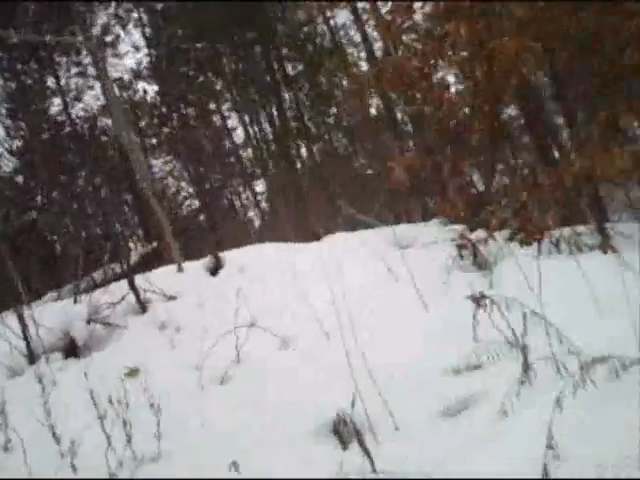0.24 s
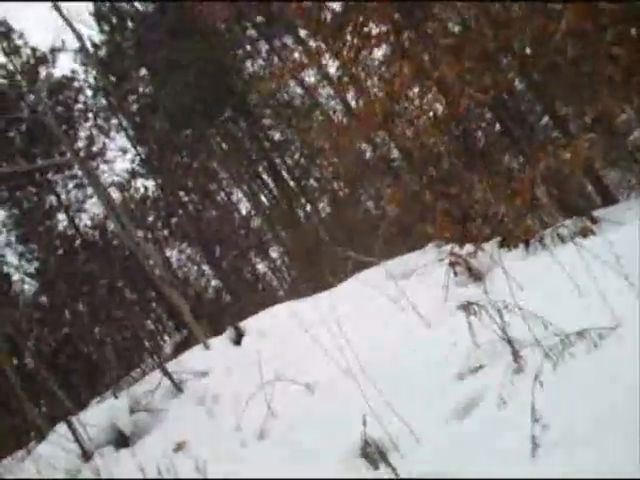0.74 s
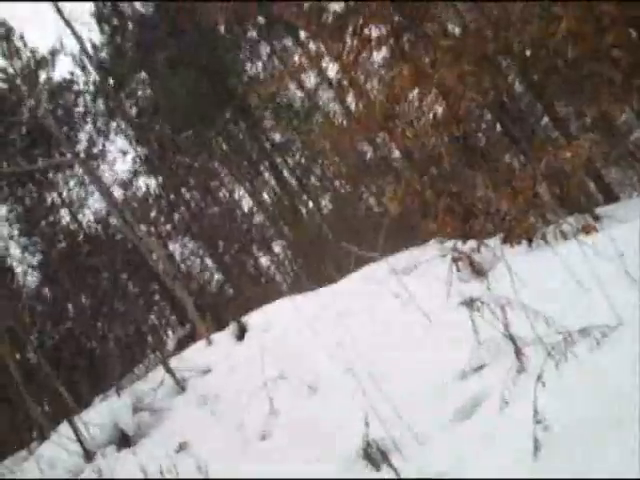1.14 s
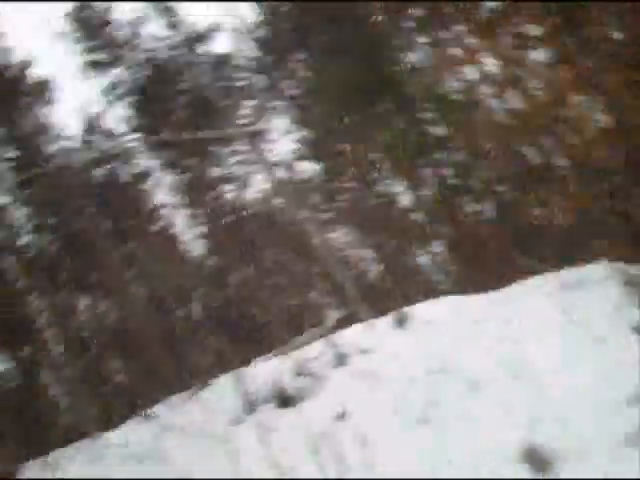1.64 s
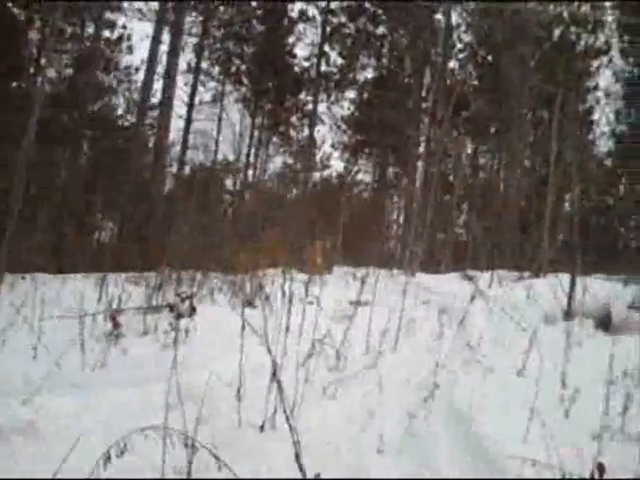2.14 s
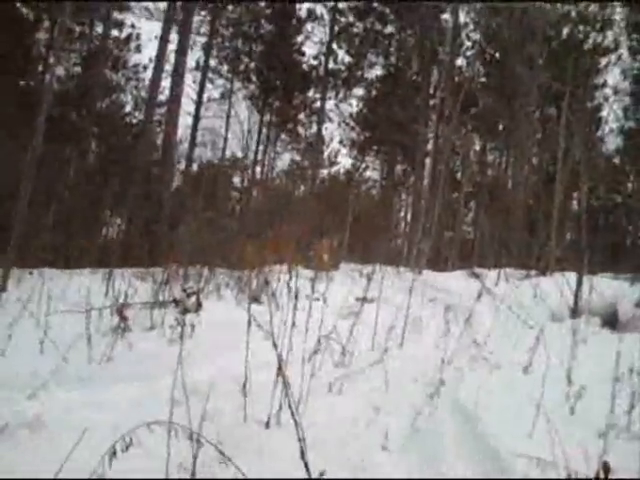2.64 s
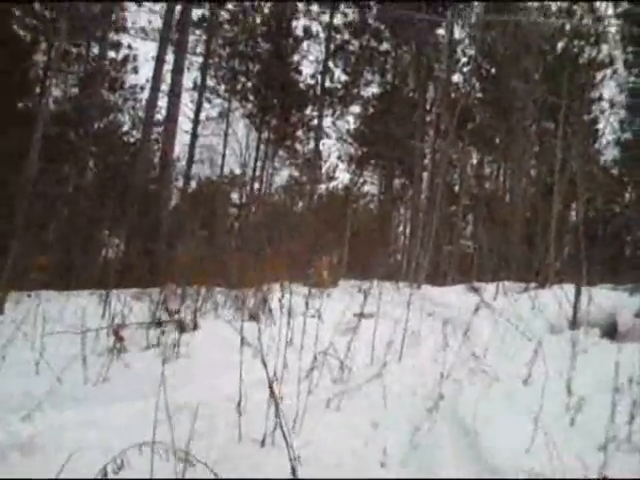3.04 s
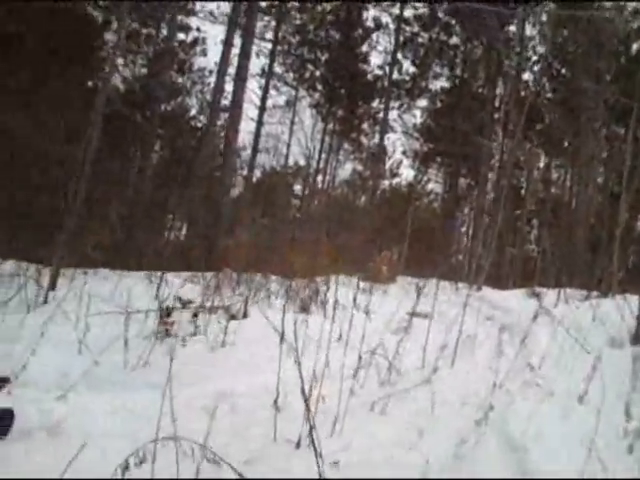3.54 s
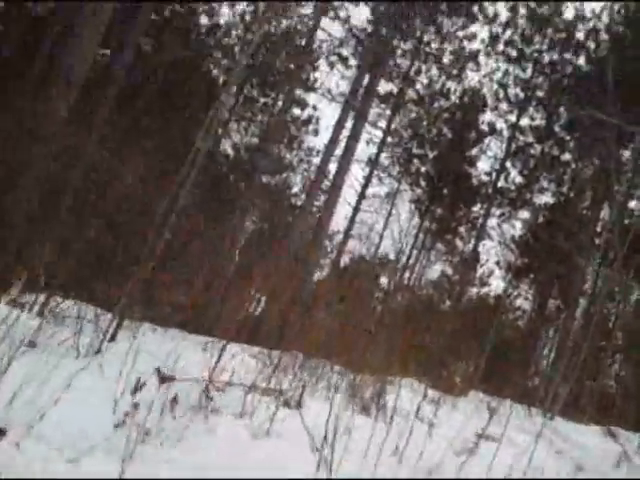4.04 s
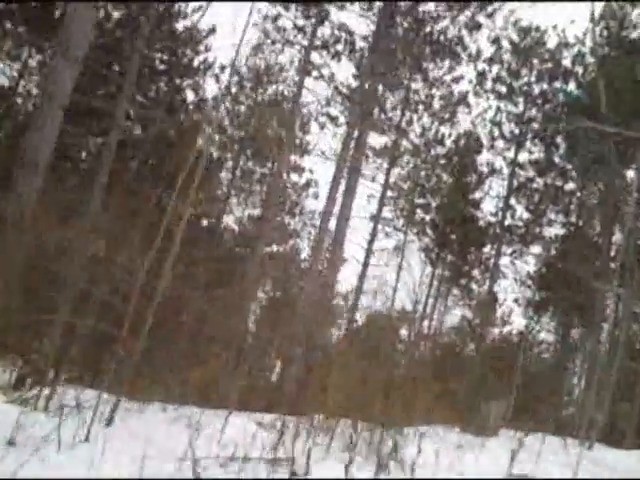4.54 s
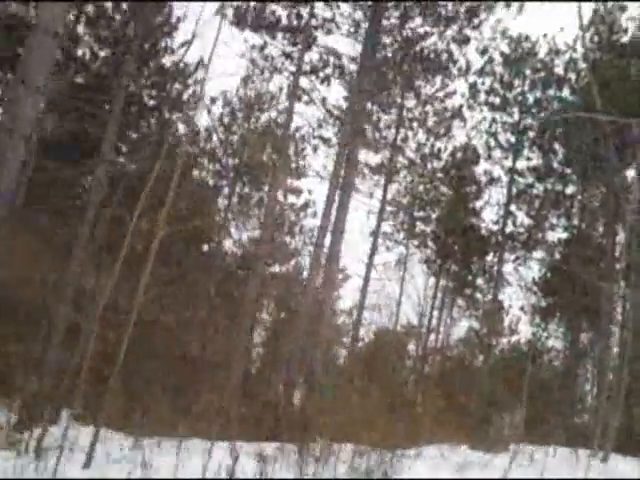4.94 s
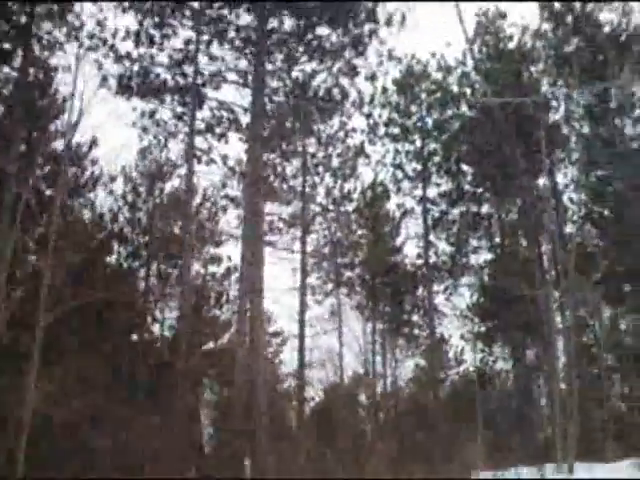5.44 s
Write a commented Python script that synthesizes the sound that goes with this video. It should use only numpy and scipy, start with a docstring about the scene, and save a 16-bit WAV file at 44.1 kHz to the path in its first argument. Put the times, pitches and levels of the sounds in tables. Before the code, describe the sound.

Close up from the rider's seat, a vintage snowmobile throbs slowly, gives a short belt squeak and a few dull thumps, then gradually picks up speed and holds it. A loose metal panel chatters with each firing and knocks harder toward the end, over a pulsing fan hiss and brief grinding of snow. The outdoor sound is dry, and a cheap microphone makes the treble harsh.

```python
"""An old snowmobile engine chugs at low speed and slowly picks up, heard from the seat.
Its firings shake the frame, boom under the hood and puff from the exhaust. Loose sheet metal
chatters and knocks in step, the drive belt squeaks near the start, and snow grinds under the sled.
A pocket camera takes the sound at a low sample rate and holds each sample,
which mirrors the clatter into the treble."""
import sys
import numpy as np
from scipy import signal
from scipy.fft import rfft, irfft
from scipy.io import wavfile
from scipy.ndimage import uniform_filter1d

SR = 44100
rng = np.random.default_rng(int(sys.argv[2]) if len(sys.argv) > 2 else 0)


def int16_out(signal):
    """Quantize to a 16-bit WAV file."""
    q = np.round(np.clip(np.atleast_2d(signal).T, -1, 1) * 32767)
    wavfile.write(sys.argv[1], SR, q.astype(np.int16))


N = 250488
TIME = np.arange(N) / SR

# how hard the engine works, 0 at full load: t/s, level/dB
ENGINE_LOAD = [(0, -14.5), (.5, -11.5), (1.0, -7), (1.6, -9), (2.15, -10), (2.85, -6.5), (3.45, -8),
               (4.05, -3), (4.3, -5), (4.95, 0), (5.68, -2.5)]
# the tones at which the loose metal panel rings: f/Hz, width/Hz, level/dB
PANEL_TONES = [(1323, 64, -10.5), (1544, 33, -35), (1982, 94, -3.5), (2302, 77, 11.5), (2860, 117, -11.5),
               (2964, 84, 0)]
# the hollow tones of the hood: f/Hz, width/Hz, level/dB
HOOD_TONES = [(390, 120, 14.5), (576, 44, 12), (790, 35, -5.5), (1310, 33, -5.5)]


def amp(db):
    """Turn decibels into a factor to multiply by."""
    return 10 ** (np.asarray(db) / 20)


def curves(table):
    """Join a table's points with straight lines in time, one curve per column."""
    times, *columns = np.transpose(table)
    return [np.interp(TIME, times, column) for column in columns]


def unit(x):
    """Scale a signal to an average power of 1."""
    return x / np.sqrt(np.mean(x ** 2))


def even(x, span_s):
    """Even out changes in loudness that are slower than span_s."""
    power = uniform_filter1d(x ** 2, int(span_s * SR))
    power = uniform_filter1d(power, int(span_s * SR / 2))
    return x / np.sqrt(np.abs(power) + np.mean(x ** 2) / 1000)


def ring(x, hz, width_hz):
    """Let a signal ring at one pitch; a narrower width rings longer."""
    return signal.lfilter(*signal.iirpeak(hz, hz / width_hz, fs=SR), x)


def ring_twice(x, hz, width_hz):
    """Ring twice at the same pitch, so less of the other pitches gets through."""
    return ring(ring(x, hz, width_hz), hz, width_hz)


def body(x, tones, stretch=1, damping=1):
    """An object rings at several tones; touching it can shift and shorten them."""
    return sum((-1) ** k * amp(db) * ring(x, hz * stretch, width * damping)
               for k, (hz, width, db) in enumerate(tones))


def firings(cycles, scatter_db, jitter_s):
    """Up to two pulses per engine cycle, each a little off in time and strength."""
    # how strong every second firing is: t/s, strength/0-1
    second_stroke = [(0, 0.6), (.45, 0), (1.0, 0.63), (1.6, 1), (2.0, 0.5), (2.5, 0), (5.68, 0)]
    at = np.flatnonzero(np.diff(np.floor(2 * cycles)))
    size_chance, time_chance = rng.standard_normal((len(at), 2)).T
    strength = np.where(np.arange(len(at)) % 2, curves(second_stroke)[0][at], 1)
    late = (jitter_s * SR * time_chance).astype(int)
    pulses = np.zeros(N)
    pulses[np.clip(at + late, 0, N - 1)] = strength * amp(scatter_db * size_chance)
    return pulses


def surge(cycles, depth, decay_cycles, scatter_db=3):
    """A push that starts with each engine cycle and fades; no two are equally hard."""
    hardness = amp(scatter_db * rng.standard_normal(200))[cycles.astype(int) % 200]
    return unit(1 + depth * hardness * np.exp(-(cycles % 1) / decay_cycles))


def rumble(cycles, throb_db=1.45, throb_hz=10.4):
    """Firings rock the frame and ring the air under the hood, which booms louder on bumps."""
    # rocking of the frame: t/s, level/dB
    shake_levels = [(0, -33), (.3, -33.5), (.6, -25.5), (1.25, -17.5), (1.95, -30), (2.8, -40), (3.05, -56),
                    (3.75, -42), (4.7, -27), (5.45, -20.5), (5.68, -29)]
    # the boom swells where a multiple of the engine speed meets its pitch: t/s, level/dB
    boom_levels = [(0, -33), (.3, -23), (.9, -23.5), (1.12, -12.5), (1.58, -14), (1.75, -22), (2.8, -26),
                   (3.3, -25), (5.68, -24)]
    shake_db, boom_db = curves(shake_levels) + curves(boom_levels)
    throb = unit(ring_twice(rng.standard_normal(N), throb_hz, throb_hz))
    boom_db = boom_db + bump_lift_db() + throb_db * throb
    pulses = firings(cycles, scatter_db=1, jitter_s=.0005)
    shake = ring_twice(pulses, 26.1, 10.5)
    boom = ring(ring(pulses, 57.0, 3.05), 60.2, 26.0)
    return even(shake, span_s=0.39) * amp(shake_db) + even(boom, span_s=0.1) * amp(boom_db)


def exhaust_and_intake(cycles, gas_db=-35.5):
    """Each firing puffs from the silencer; rough gas follows down the pipe, and the intake drones."""
    # exhaust puffs: t/s, level/dB
    puff_levels = [(0, -44), (.55, -42), (.8, -31.5), (1.3, -33.5), (2.55, -31.5), (2.8, -27), (3.3, -28),
                   (3.52, -31.5), (3.85, -24.5), (5.68, -26)]
    # drone of the air intake: t/s, level/dB
    intake_levels = [(0, -51.5), (.75, -38), (1.5, -46), (2.6, -46.5), (4.1, -37.5), (5.68, -39)]
    # tones of the exhaust pipe: f/Hz, width/Hz, level/dB
    pipe_tones = [(375, 167, -10.5), (381.6, 170, 4.5), (465, 125, 4.5), (591, 60, 0.5), (812, 85, -7.5),
                  (889, 54, -4)]
    # tones of the box the engine breathes through: f/Hz, width/Hz, level/dB
    airbox_tones = [(162, 25, 0), (206, 40.5, 1.5), (271.8, 30, -4)]
    puff_db, intake_db, load_db = curves(puff_levels) + curves(intake_levels) + curves(ENGINE_LOAD)
    pulses = unit(firings(cycles, scatter_db=1.3, jitter_s=.00025))
    rough_pulses = pulses + amp(-4) * rng.standard_normal(N)
    puff = ring(ring(ring(rough_pulses, 111.6, 24.8), 89, 42), 88, 43)
    flow = unit(rng.standard_normal(N) * surge(cycles, depth=0.42, decay_cycles=0.53))
    rush = flow + amp(-8) * pulses
    gas = body(rush, pipe_tones)
    intake = ring(body(rush, airbox_tones), 264, 207)
    return (even(puff, span_s=0.055) * amp(puff_db)
            + even(gas, span_s=0.53) * amp(gas_db + load_db)
            + even(intake, span_s=0.14) * amp(intake_db))


def metal_chatter(push, level_db=-26.5, contacts_per_s=520, spread_db=2, bump_share=0.11):
    """Loose sheet metal buzzes with many tiny taps, hardest just after each push of the engine."""
    load_db, = curves(ENGINE_LOAD)
    touching = rng.random(N) < contacts_per_s / SR
    taps = touching * amp(spread_db * rng.standard_normal(N)) * rng.choice([-1, 1], N)
    # the panel bounces, so its taps come in short bunches
    bounce = amp(2.5 * unit(ring_twice(rng.standard_normal(N), 55, 60)))
    buzz = (unit(taps) + amp(-4) * rng.standard_normal(N)) * push * bounce
    metal = even(body(buzz, PANEL_TONES) + amp(-27.5) * buzz, span_s=0.19)
    return metal * amp(level_db + load_db + bump_share * bump_lift_db())


def fan_hiss(push, level_db=-29, load_share=0.82):
    """Fan and track hiss, pulsing gently with the engine and growing as it works harder."""
    # the hiss from bass to treble: f/Hz, level/dB
    hiss_shape = [(100, -50), (300, -28), (700, -3), (1050, -1.5), (1400, 11.5), (1800, 5.5), (2600, 15.5),
                  (3300, -1), (4000, 6.5)]
    hz, db = np.transpose(hiss_shape)
    load_db, = curves(ENGINE_LOAD)
    all_hz = np.arange(N // 2 + 1) * SR / N
    gain = amp(np.interp(np.log(all_hz + 1), np.log(hz), db))
    hiss = unit(irfft(rfft(rng.standard_normal(N)) * gain, N))
    return hiss * push ** 0.27 * amp(level_db + load_share * load_db)


def panel_knocks(cycles, rise_s=.003, decay_s=.002, settle_s=.014):
    """The panel hits its seat; the contact lowers its ring a little and lets it ring longer, and the hood
    answers dully."""
    # single hard knocks: t/s, level/dB, thud against clack/dB
    single_knocks = [(0.0198, -36.5, -34), (0.297, -29, -17), (1.7263, -28.5, -18), (1.7322, -33, -8),
                     (1.8415, -25, -5), (1.8926, -31.5, -22), (1.921, -23.5, -17.5), (1.987, -32, -31),
                     (2.0497, -33, -34), (4.007, -24, -17), (5.1806, -28.5, -17), (5.2863, -23.5, -29)]
    # how the panel lands, skidding or squarely: t/s, scrape against ring/dB, ring f/Hz
    landing = [(0, -10, 2300), (.3, 3, 1990), (.7, 5, 2190), (1.85, 1.5, 2130), (2.6, 2, 2220),
               (4.5, -7.5, 2297), (4.62, 1.5, 2118), (5.05, -8, 2067), (5.4, 2, 2170)]
    out, t = np.zeros(N), TIME[:SR // 20]
    skid_db, ring_hz = curves(landing)
    rise = 1 - np.exp(-t / rise_s)
    touch = rise ** 2 * np.exp(-t / decay_s)
    touch = touch / touch.max()
    settle = .13 * np.exp(-t / settle_s) * rise
    for s, db, thud_db in single_knocks + repeated_slaps(cycles):
        now = int(s * SR)
        skid = amp(skid_db[now])
        scrape = rng.standard_normal(len(t)) * (touch + settle)
        slap = unit(touch * np.sin(2 * np.pi * ring_hz[now] * t))
        ringing = unit(body(scrape, PANEL_TONES, stretch=0.99, damping=0.79))
        crack = .5 * np.sqrt(skid) * unit(scrape)  # more skid, more dry crack
        clack = unit(slap + skid * unit(ringing + crack))
        thud = unit(body(scrape, HOOD_TONES))
        add(out, s - .0007, amp(db) * (clack + amp(thud_db) * thud))
    return out


def add(track, s, sound):
    """Mix a sound into a track, starting at s seconds."""
    start = max(int(s * SR), 0)
    track[start:start + len(sound)] += sound[:N - start]


def belt_squeak(waver_hz=24, roughness=0.29):
    """The drive belt chirps three times, then slips in one short, rough squeal."""
    # the chirps: t/s, length/s, f/Hz, peak level/dB
    chirps = [(.182, .014, 3950, -32), (.222, .017, 3950, -28), (.262, .014, 3950, -28)]
    # the path of the squeal: t/s, f/Hz, level/dB
    squeal = [(.275, 3300, -45), (.29, 3284, -19.5), (.298, 3353, -19.5), (.306, 3252, -23),
              (.316, 3330, -19.5), (.332, 3313, -29), (.348, 3326, -23), (.358, 3180, -29.5),
              (.38, 3300, -48)]
    hz, db = curves(squeal)
    waver, grit = (unit(ring(rng.standard_normal(N), rate_hz, rate_hz)) for rate_hz in (120, 300))
    phase = 2 * np.pi * np.cumsum(hz + waver_hz * waver) / SR
    slipping = (TIME > squeal[0][0]) & (TIME < squeal[-1][0])
    out = np.sqrt(2) * np.sin(phase) * amp(db) * slipping
    for s, length, pitch_hz, peak_db in chirps:
        t = TIME[:int(length * SR)]
        swell = amp(peak_db) * np.sin(np.pi * t / length)
        add(out, s, swell * np.sin(2 * np.pi * pitch_hz * t))
    return out * (1 + roughness * grit)


def bump_lift_db():
    """Bumps jolt the hood and the loose metal; each lifts the level in one smooth arch."""
    # bumps under the sled: middle t/s, length/s, lift of the boom/dB
    bumps = [(0.456, 0.15, 7), (.65, 0.074, 6), (0.799, 0.037, 11.5), (1.859, 0.057, 10),
             (2.622, 0.35, 6.5), (3.173, 0.1, 11.5), (4.055, 0.26, 10), (4.76, 0.11, 5.5),
             (4.868, 0.24, 7.5), (5.375, 0.2, 8.5)]
    return sum(db * np.cos(np.pi * np.clip((TIME - s) / length, -.5, .5)) for s, length, db in bumps)


def snow_rubs(grain_db=4):
    """Packed snow grinds under the sled: its grains sound the hood and crunch on their own."""
    # skis and track rub over uneven snow: t/s, length/s, hollow level/dB, crunch level/dB
    rubs = [(0.426, 0.033, -43, -38), (0.688, .12, -61, -40.5), (1.744, 0.047, -44.5, -30),
            (1.82, 0.053, -36, -24), (1.867, 0.12, -42, -30.5), (2.21, 0.044, -34, -30.5),
            (3.02, 0.2, -36, -44.5), (3.162, 0.15, -31, -41.5), (3.634, 0.024, -30, -27),
            (3.675, 0.018, -38, -31), (3.926, 0.38, -38, -34), (5.157, 0.025, -51, -23.5),
            (5.357, 0.15, -29, -33.5), (5.522, 0.15, -36, -46)]
    grains = rng.standard_normal(N) * amp(grain_db * unit(ring(rng.standard_normal(N), 125, 270)))
    hollow = even(body(grains, HOOD_TONES), span_s=0.018)
    crunch = even(ring(ring(grains, 2170, 1160), 2430, 1160), span_s=0.22)
    out = np.zeros(N)
    for s, length, hollow_db, crunch_db in rubs:
        swell = np.sin(np.pi * np.clip((TIME - s) / length, 0, 1))
        out += swell * (amp(hollow_db) * hollow + amp(crunch_db) * crunch)
    return out


def repeated_slaps(cycles, build_db_per_s=8, fade_db_per_s=40, jitter_s=.0007, scatter_db=.8):
    """List the knocks when each engine cycle throws the panel; they build slowly and fade fast."""
    # spells of rattling: start t/s, end t/s, hardest t/s, level there/dB, thud against clack/dB
    spells = [(.84, 1.1, 1.08, -32.5, -10.5), (2.14, 2.53, 2.5, -31, -14), (2.65, 2.78, 2.76, -37.5, -28),
              (3.77, 3.86, 3.79, -33.5, -28), (3.94, 4.24, 4.18, -28, -12), (4.45, 4.55, 4.52, -25.5, -32),
              (4.59, 4.99, 4.86, -23, -18), (4.99, 5.13, 5.06, -29, -28), (5.35, 5.45, 5.39, -24, -21)]
    cycle_starts = TIME[np.flatnonzero(np.diff(np.floor(cycles)))]
    chance = rng.standard_normal((len(cycle_starts), 2)) * [jitter_s, scatter_db]
    slaps = []
    for start, end, hardest, db, thud_db in spells:
        for s, (late_s, chance_db) in zip(cycle_starts, chance):
            if start < s < end:
                drop_db = max(build_db_per_s * (hardest - s), fade_db_per_s * (s - hardest))
                slaps.append((s + late_s, db + chance_db - drop_db, thud_db))
    return slaps


def mount_thumps(width_s=0.0017):
    """The engine sinks hard into its rubber mounts, which round off each blow."""
    # the blows: t/s, peak level/dB
    blows = [(1.136, -13), (1.171, -17), (1.205, -14), (1.239, -12)]
    out = np.zeros(N)
    from_middle = (TIME[:SR // 50] - .01) / width_s
    thump = (from_middle ** 2 - 1) * np.exp(-from_middle ** 2 / 2)
    for s, db in blows:
        add(out, s - .009, amp(db) * thump)
    return out


def scene():
    """One engine sets the beat for rumble, exhaust, metal and fan; snow gives no echo."""
    # engine cycles per second: t/s, f/Hz
    engine_speed = [(0.0, 11.9), (0.35, 12.2), (0.7, 12.95), (1.2, 14.82), (1.6, 16.05), (2.0, 15.23),
                    (2.25, 18.19), (2.55, 18.33), (2.8, 21.59), (2.95, 22.54), (3.15, 22.94), (3.4, 24.74),
                    (3.7, 22.76), (4.0, 24.31), (4.4, 22.41), (4.9, 22.44), (5.3, 21.97), (5.68, 22.68)]
    cycle_start_s = 4.7913  # one cycle starts exactly here
    cycles = np.cumsum(curves(engine_speed)[0]) / SR
    cycles = cycles - cycles[int(cycle_start_s * SR)] % 1 + 1
    engine = rumble(cycles) + exhaust_and_intake(cycles)
    push = surge(cycles, depth=.7, decay_cycles=.3, scatter_db=2)
    clatter = metal_chatter(push) + fan_hiss(push) + panel_knocks(cycles)
    return (engine + clatter + belt_squeak() + snow_rubs() + mount_thumps())[None]


def record(dry):
    """The camera samples slowly and holds each value, which mirrors tones around its sample rate."""
    camera_hz, top_hz = 8000, 12800
    samples = signal.resample_poly(dry, camera_hz, SR, axis=1)
    held = samples[:, np.arange(N) * camera_hz // SR]
    treble_cut = signal.ellip(14, .2, 80, top_hz, fs=SR, output="sos")
    return signal.sosfilt(treble_cut, held)


dry = scene()
out = record(dry)
int16_out(out)
```